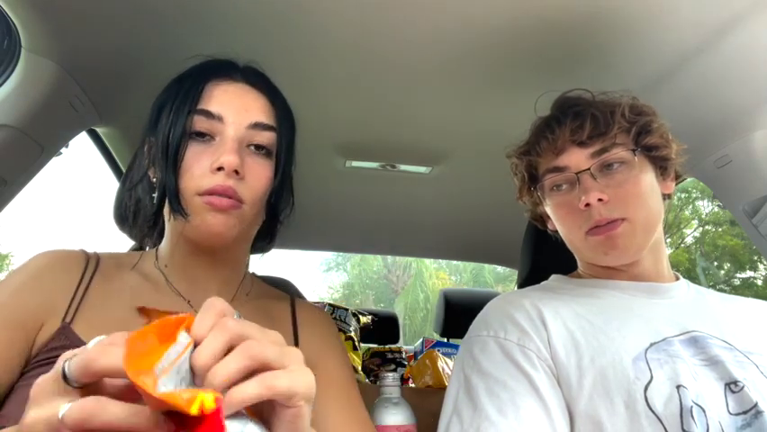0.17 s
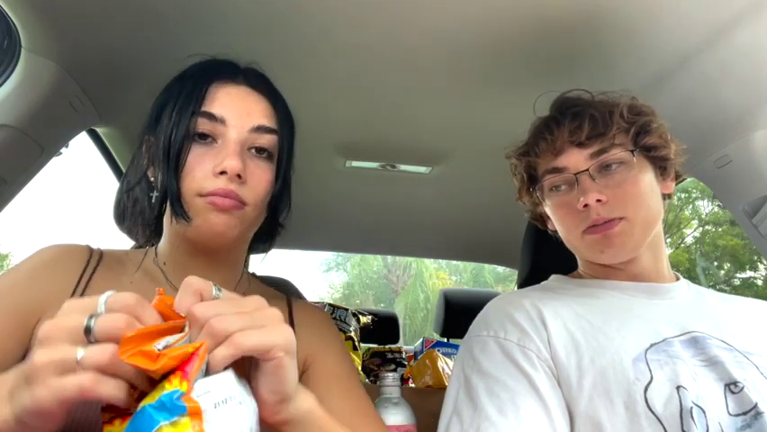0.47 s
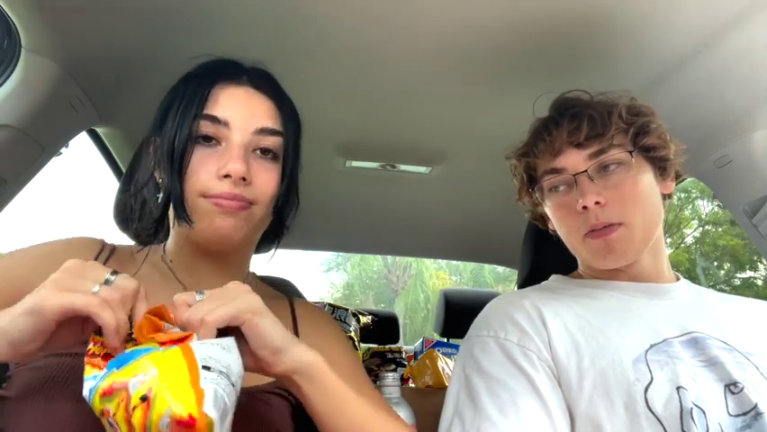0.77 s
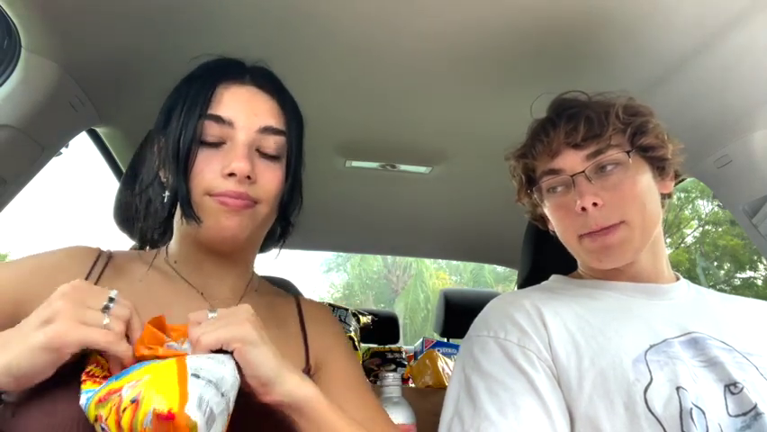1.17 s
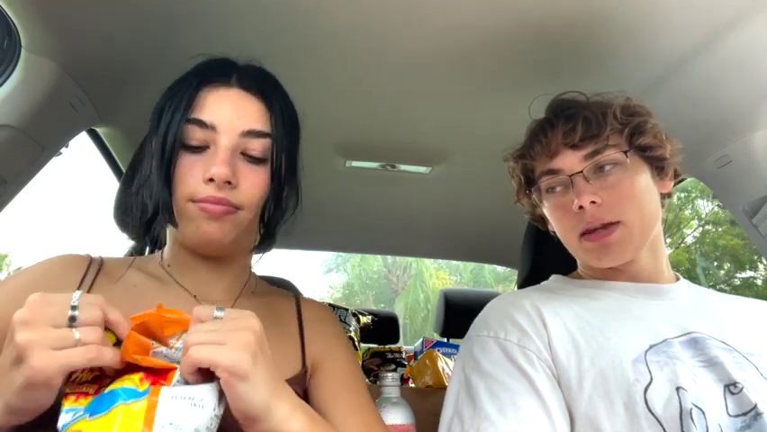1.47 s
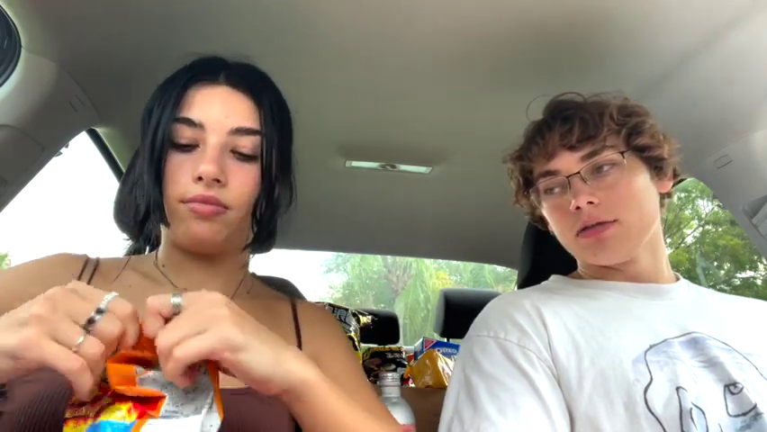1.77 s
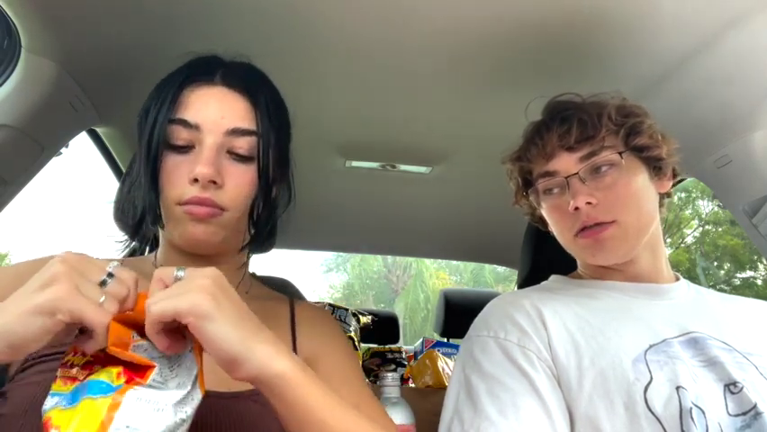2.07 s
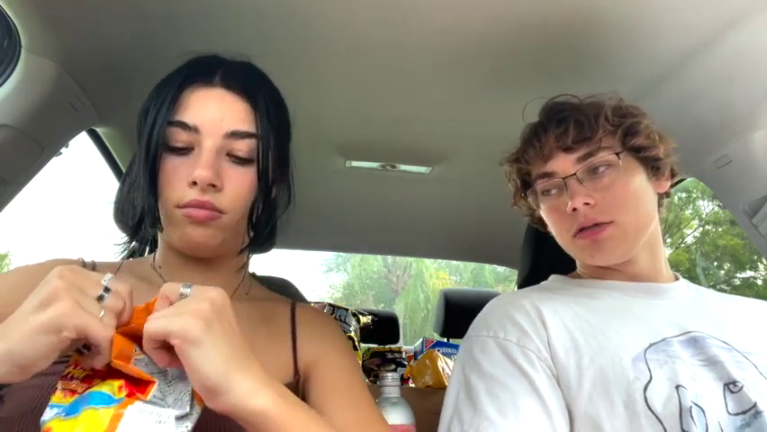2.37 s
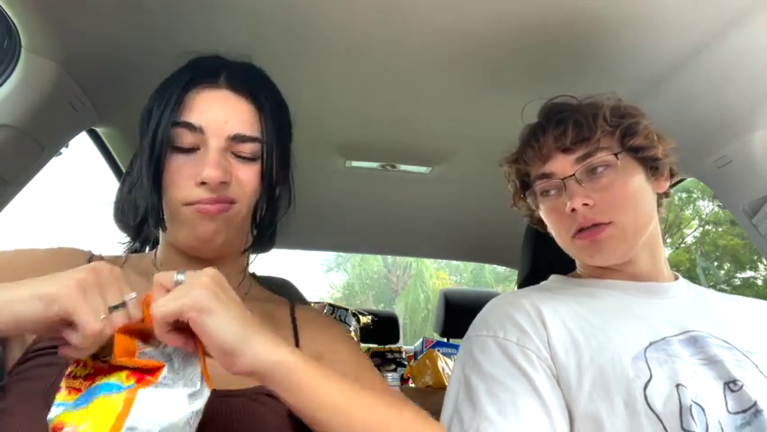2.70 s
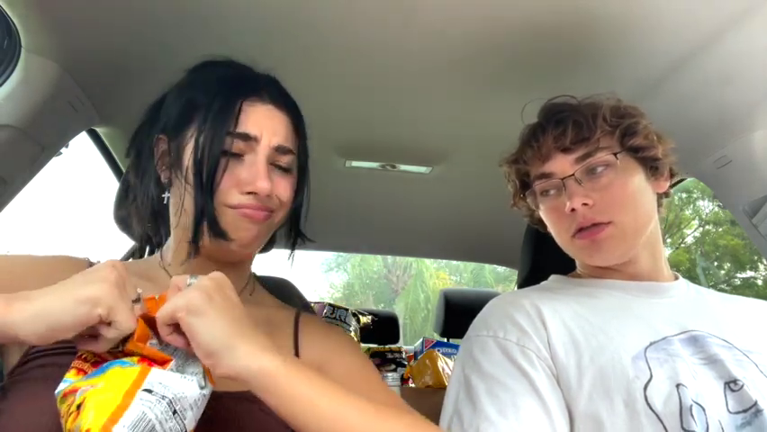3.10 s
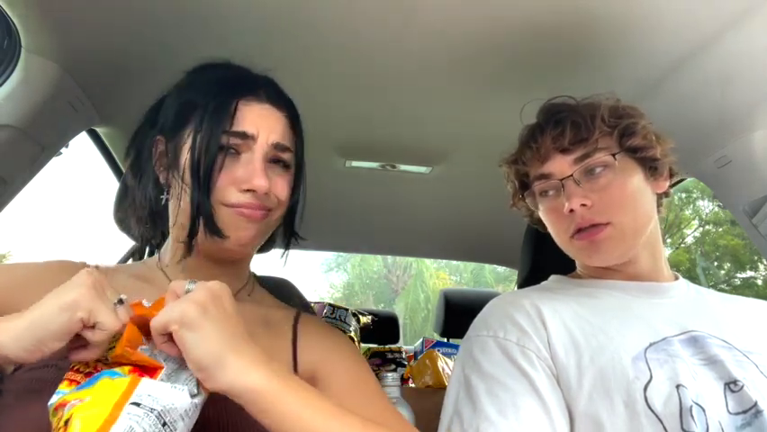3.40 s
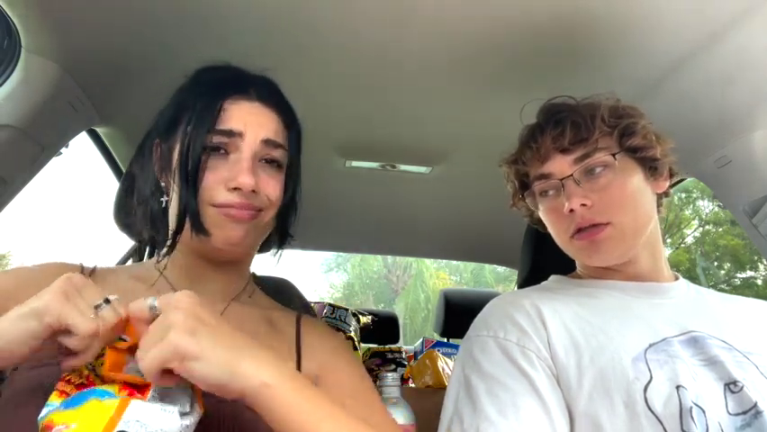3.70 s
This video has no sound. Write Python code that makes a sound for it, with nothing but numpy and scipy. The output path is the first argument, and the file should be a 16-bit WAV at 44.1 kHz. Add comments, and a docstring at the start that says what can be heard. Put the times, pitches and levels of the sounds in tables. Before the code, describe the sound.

A plastic snack bag crackles sharply as hands tug at it inside an idling car.

```python
"""Snack bag in a parked car

A foil-lined plastic bag is gripped, squeezed and pulled at close to a phone. Creases in the film
snap over, loud single ones above a dense fine crackle, and the air in the bag pops with them.
Fingers slide over the film and a palm thumps the full bag. The engine idles; the vents blow softly."""
import sys
import numpy as np
from scipy import signal
from scipy.fft import rfft, irfft, next_fast_len
from scipy.io import wavfile
from scipy.ndimage import uniform_filter1d, map_coordinates

SR = 44100
rng = np.random.default_rng(int(sys.argv[2]) if len(sys.argv) > 2 else 0)


def persist_wave(psi):
    """Save psi, clipped to +-1, as 16-bit WAV."""
    counts = np.round(np.clip(psi, -1, 1) * 32767).astype(np.int16)
    wavfile.write(sys.argv[1], SR, np.atleast_2d(counts).T)


N = 169785

POP_RISE_S, POP_T60_S, POP_SAG_PER_S = 0.002, 0.022, 25
# Crisp crackle colour, with a dip near 11 kHz and a steep cut above 16 kHz.
# Each row: frequency in Hz, level in dB.
CRISP_COLOUR = [(590, -11.5), (1160, -5.5), (1370, -1), (2870, -5), (5230, -10.5), (8360, -12.5),
                (11200, -24.5), (15200, -21), (15900, -38), (16500, -97)]
# The hollow colour of air and chips in the bag. Each row: frequency in Hz, level in dB.
BAG_COLOUR = [(60, -29), (160, -5.5), (386, -2.5), (664, 1), (931, -4.5), (1170, -2.5), (1600, -7),
              (2080, -21), (3520, -120)]
# The loud creases. Each row: start in seconds, level in dB, pop and treble trims in dB, pop pitch in Hz.
CREASE_SNAPS = [(0.041, -15, -18, -6, 574), (0.077, -4.5, -21, -16.5, 1190), (0.169, -17.5, -7, -3.5, 1150),
                (0.224, -6.5, -11.5, -12, 1060), (0.274, -0.5, -21, -16, 630), (0.312, -24, -25, 4, 598),
                (0.328, -8, -18.5, -40, 420), (0.383, -17, -15, -2, 674), (0.423, -8.5, -15.5, -14, 1190),
                (0.489, -4, -15.5, -16.5, 1210), (0.514, -12.5, -10.5, -8.5, 360),
                (0.549, -16.5, -7.5, -12.5, 1210), (0.573, -12.5, -13, -10, 584),
                (0.605, -7.5, -26, -16.5, 668), (0.649, -6.5, -27, -17.5, 583),
                (0.687, -12, -13.5, -42, 1250), (0.733, -17.5, -34, -3, 670),
                (0.82, -12.5, -15, -12.5, 746), (0.827, -11.5, -21, -9.5, 890),
                (0.883, -17.5, -17.5, -8, 533), (1.018, -6, -22.5, -10.5, 755), (1.058, -15, -15, -15, 614),
                (1.261, -28, -10, -8, 730), (1.324, -15, -15.5, -12.5, 710),
                (1.518, -20.5, -13, -16.5, 737), (1.567, -18.5, -17.5, -5, 890),
                (1.654, -22, -6.5, -14.5, 664), (1.666, -26, -3.5, -12, 650), (1.717, -19.5, -10, -7, 1170),
                (1.762, -14.5, -15.5, -5, 602), (1.839, -22, -15, -5, 1140), (1.877, -12.5, -27, -15, 420),
                (1.983, -20, -5.5, -5, 715), (2.04, -24.5, -20, -8, 720), (2.072, -24, -12, -9.5, 1420),
                (2.104, -19, -17.5, -20, 775), (2.168, -39.5, -0.5, -12, 640),
                (2.229, -20, -15.5, -8.5, 853), (2.329, -25.5, -11.5, -12.5, 723),
                (2.408, -20.5, -34, -2, 1210), (2.497, -14, -21.5, -13.5, 695),
                (2.58, -10, -11.5, -15, 650), (2.61, -24.5, -3, -17, 690), (2.625, -17, -27, -22, 1240),
                (2.649, -20.5, -12.5, -13, 840), (2.701, -20, -10, -18, 1100),
                (2.708, -13, -10.5, -17.5, 693), (2.74, -19, -16, -6.5, 730),
                (2.773, -15.5, -12.5, -16, 1230), (2.809, -10, -16.5, -18.5, 1390),
                (2.885, -12, -9.5, -15.5, 702), (2.923, -12.5, -13, -19, 1205),
                (2.937, -13.5, -10, -17, 1460), (3.095, -10, -18.5, -13, 778),
                (3.244, -25.5, -11.5, -11.5, 680), (3.263, -16.5, -14, -32, 472),
                (3.304, -20.5, -36, -11, 1320), (3.35, -20, -15.5, -8.5, 675),
                (3.398, -12.5, -17, -10.5, 1530), (3.43, -17.5, -14.5, -11.5, 855),
                (3.51, -18.5, -18.5, -15.5, 1300), (3.688, -15.5, -16.5, -12, 816),
                (3.763, -16, -21, -15, 970), (3.797, -12, -26, -12.5, 653)]


def snaps():
    """A crease creaks ever louder, lets go with a crack, pops the bag's air and dies in the cabin."""
    start, db, pop_db, treble_db, hz = np.transpose(CREASE_SNAPS)
    rise_s, crack_t60_s, cabin_t60_s, tick_t60_s = 0.0015, 0.03, 0.14, 0.0046
    thud_cut_hz, crack_cut_hz, crossover_hz = 260, 860, 3590
    t = np.arange(SR // 8) / SR
    shape = (1 - np.exp(-t / rise_s)) * (amp(-60 * t / crack_t60_s) + amp(-11 - 60 * t / cabin_t60_s))
    tick = amp(1 - 60 * t / tick_t60_s)
    lowpass = lambda f: 1 / (1 + (f / crossover_hz) ** 4)
    crack = bursts(start, db - 3.5, shape, CRISP_COLOUR)
    crack = filtered(crack, lambda f: lowpass(f) * f ** 2 / (f ** 2 + crack_cut_hz ** 2))
    treble = bursts(start, db + treble_db + 8, shape + tick, CRISP_COLOUR)
    treble = filtered(treble, lambda f: 1 - lowpass(f))
    thud = bursts(start, db + pop_db, shape, BAG_COLOUR)
    thud = filtered(thud, lambda f: f ** 4 / (f ** 4 + thud_cut_hz ** 4))
    lead_in = t[:SR // 50]
    swell = np.exp((lead_in - lead_in[-1]) / 0.0031)
    creak = bursts(start - lead_in[-1], db - 19.5, swell, CRISP_COLOUR)
    phase = sagging_phase(hz, t - 2 * POP_RISE_S)
    pop = place(start, ring(db + pop_db + 17, t) * np.array([np.sin(phase), 0.5 * np.cos(phase)]))
    return creak + crack + treble + thud + pop


# How hard the film is worked. Each row: time in seconds, crackle level in dB, body trim in dB.
HAND_PRESSURE = [(0, -30.5, -7), (0.03, -34, -4), (0.09, -27.5, -3), (0.2, -23, -7.5), (0.255, -33.5, 1),
                 (0.36, -27, -8), (0.53, -30.5, -9), (0.659, -32, -2.5), (0.79, -39.5, -15.5),
                 (0.861, -31.5, -7.5), (0.993, -47, 0.5), (1.04, -31, -12), (1.17, -41, -10),
                 (1.24, -38, 1.5), (1.475, -39, -17), (1.5, -58, -11), (1.54, -45.5, 1.2),
                 (1.689, -30.5, -9.5), (1.79, -42.5, -2.5), (1.95, -53, 2.5), (2.15, -49, -3),
                 (2.29, -54.5, -1), (2.46, -43.5, -11), (2.54, -46, 7), (2.68, -52.5, -5),
                 (2.76, -36, -8.5), (2.86, -63.5, 14), (2.911, -33.5, -9), (3.0, -41.5, -14),
                 (3.21, -53.5, 3), (3.46, -43, -7.5), (3.602, -50.5, -1.5), (3.66, -43, 1.5),
                 (3.85, -38, 0.5)]


def crackle():
    """Countless tiny creases give way in clumps, louder the harder the film is worked."""
    at, level_db, body_db = np.transpose(HAND_PRESSURE)
    grains_per_s, grain_t60_s = 1000, 0.014
    pip_hz, pip_octaves, pip_share = 720, 0.45, 0.6
    count = int(grains_per_s * N / SR)
    start = rng.random(count) * N / SR
    size = np.minimum(rng.exponential(size=count), 2.6)
    tilt_db = 2.5 * rng.uniform(-1, 1, count)
    clump_db = 2 * wobble(40)[(start * SR).astype(int)]
    db = 3.5 * size + clump_db
    t = np.arange(SR // 30) / SR
    shape = (1 - np.exp(-t / 0.0003)) * amp(-60 * t / grain_t60_s)
    film = unit(bursts(start, db + tilt_db, shape, CRISP_COLOUR))
    body = unit(bursts(start, db - tilt_db, shape, BAG_COLOUR))
    few = slice(0, count // 10)  # one crease in ten also pops the air, at its own pitch
    hz = pip_hz * 2 ** (pip_octaves * rng.standard_normal((count, 1))[few])
    phase = 2 * np.pi * hz * t
    pips = unit(place(start[few], ring(db[few], t) * np.array([np.sin(phase), 0.5 * np.cos(phase)])))
    body = np.sqrt(1 - pip_share) * body + np.sqrt(pip_share) * pips
    time = np.arange(N) / SR
    return amp(np.interp(time, at, level_db)) * (film + amp(2.5 + np.interp(time, at, body_db)) * body)


# Bright sliding hiss, with a notch near 11.5 kHz and a cut above 16 kHz.
# Each row: frequency in Hz, level in dB.
BRIGHT_COLOUR = [(2500, -5), (7000, 2.5), (9500, -1.5), (11500, -11.5), (14000, 1), (15900, -8.5),
                 (16500, -63)]
# Finger strokes. Each row: centre in seconds, length in seconds, level in dB, tilt towards bright in dB.
FINGER_STROKES = [(0.13, 0.06, -22.5, -4), (0.476, 0.091, -32.5, -3), (1.089, 0.039, -28.5, -3.5),
                  (1.434, 0.08, -38.5, 8.5), (2.402, 0.051, -40, 7.5), (3.046, 0.073, -38.5, 3),
                  (3.727, 0.13, -43, -9.5)]


def finger_slides():
    """Fingers rub over the film in soft, grainy swells of dull and bright hiss."""
    time, power = np.arange(N) / SR, np.zeros((2, N))
    for centre, length, db, tilt_db in FINGER_STROKES:
        swell = np.exp(-(2 * (time - centre) / length) ** 2)
        power += (amp(db + tilt_db * np.array([[-1], [1]])) * swell) ** 2
    dull_gain, bright_gain = np.sqrt(power)
    hiss = lambda colour: coloured(patchy_noise(bins=2, frames=10), colour)
    dull = hiss(CRISP_COLOUR) + amp(-6) * hiss(BAG_COLOUR)
    return (dull * dull_gain + hiss(BRIGHT_COLOUR) * bright_gain) * amp(1.74 * wobble(300))


# Palm hits. Each row: start in seconds, level in dB, starting pitch in Hz.
PALM_HITS = [(0.13, -7.5, 398), (0.155, -5.5, 286), (0.279, -8, 328), (2.886, -23, 374)]


def palm_thumps():
    """The palm hits the full bag: a low, hollow thump of a few cycles."""
    start, db, hz = np.transpose(PALM_HITS)
    t = np.arange(SR // 8) / SR
    thump = ring(db, t, t60_s=0.02) * np.sin(sagging_phase(hz, t))
    return place(start, np.array([thump, thump]))


# The engine's hum. Each row: pitch in Hz, relative level in dB.
ENGINE_TONES = [(26.9, -61.5), (53.8, -51.5), (80.7, -50.5), (107.5, -67), (325, -60)]
# Low vent rush, plus a separate faint hiss near 14.5 kHz above a dip.
# Each row: frequency in Hz, level in dB.
BED_COLOUR = [(15, -30), (25, -11), (100, -4.5), (373, -13.5), (451, -36), (1940, -47), (11800, -51),
              (14500, -31), (16000, -51)]


def engine_and_vents():
    """The engine idles a little unsteadily under the soft rush of the vents."""
    phase_per_hz = 2 * np.pi * np.cumsum(1 + 0.0078 * wobble(2.9)) / SR
    hum = sum(amp(db + 4.5 + 3 * wobble(8.02)) * np.sin(hz * phase_per_hz + rng.uniform(0, 2 * np.pi))
              for hz, db in ENGINE_TONES)
    rush = coloured(rng.standard_normal((2, N)), BED_COLOUR)
    return amp(-51 + 1.3 * wobble(7.65)) * rush + hum * [[1], [0]]  # hum in the mid only


def ring(db, t, t60_s=POP_T60_S):
    """Envelopes of the bag's air ringing: a quick rise and a short decay."""
    return amp(db[:, None] - 60 * t / t60_s) * (1 - np.exp(-t / POP_RISE_S))


def sagging_phase(hz, t):
    """Phases of tones whose pitch falls away from hz."""
    return 2 * np.pi * hz[:, None] * (1 - np.exp(-POP_SAG_PER_S * t)) / POP_SAG_PER_S


def bursts(start, db, shape, colour):
    """Mid and side noise bursts of one envelope and colour; overlaps add in power."""
    power = place(start, (amp(db)[:, None] * shape)[None] ** 2)
    return coloured(patchy_noise(), colour) * np.sqrt(power)


def patchy_noise(bins=5, frames=5, depth_db=2.5):
    """Two noises sharing patches of random gain, so no two creases have the same colour."""
    spectra = signal.stft(rng.standard_normal((2, N)), nperseg=256)[2]
    patches = uniform_filter1d(rng.standard_normal(spectra.shape[1:]), size=bins, axis=0)
    patches = uniform_filter1d(patches, size=frames, axis=1)
    return signal.istft(spectra * amp(depth_db * unit(patches)), nperseg=256)[1][:, :N]


def place(start, sounds):
    """Sums short sounds (channels x events x samples) at their starts in seconds."""
    at = (np.round(start * SR).astype(int)[:, None] + np.arange(sounds.shape[2])).ravel()
    return np.array([np.bincount(at, channel.ravel(), N + SR)[:N] for channel in sounds])


def coloured(noise, colour):
    """Noise through an EQ curve, at unit RMS."""
    return unit(filtered(noise, lambda hz: amp(along(colour, hz))))


def filtered(x, response):
    """Applies a complex frequency response."""
    size = next_fast_len(N + 8192)
    return irfft(rfft(x, size) * response(np.fft.rfftfreq(size, 1 / SR)), size)[..., :N]


def wobble(rate):
    """A smooth random curve, rate knots a second."""
    return map_coordinates(rng.standard_normal(int(N * rate / SR) + 4), [np.arange(N) * rate / SR])


def along(points, hz):
    """Reads (Hz, value) points on a log frequency axis."""
    freqs, values = np.transpose(points)
    return np.interp(np.log(hz + 1), np.log(freqs + 1), values)


def amp(db):
    return 10 ** (np.asarray(db) / 20)


def unit(x):
    return x / np.sqrt(np.mean(x ** 2) + 1e-20)


# Phase between the phone's two mic ports. Each row: frequency in Hz, left's lead in radians.
LEFT_LEAD = [(0, 0.5), (1210, 1.22), (2500, 5.5), (4480, 6.5), (6030, 7.5), (7320, 3.5), (8960, 8),
             (10400, 3.5), (12700, 2.5), (14000, 0.8)]
# Stereo balance. Each row: frequency in Hz, left over right in dB.
LEFT_BALANCE = [(40, 7.5), (150, 0.5), (700, 5), (1400, 0), (15000, 0.2)]
# Stereo focus. Each row: frequency in Hz, left-right likeness from 0 to 1.
LIKENESS = [(40, 0.92), (120, 0.95), (500, 0.51), (2500, 0.33), (6000, 0.25), (12000, 0.91)]


def scene():
    """Bag and car, mixed as mid and side, reach the phone's two mic ports."""
    mid, side = snaps() + crackle() + finger_slides() + palm_thumps() + engine_and_vents()
    sign = np.array([[1], [-1]])
    width = lambda hz: np.arccos(np.clip(along(LIKENESS, hz), 0, 1)) / 2
    lead = lambda hz: np.interp(hz, *np.transpose(LEFT_LEAD))
    ports = lambda hz: amp(sign * along(LEFT_BALANCE, hz) / 2) * np.exp(0.5j * sign * lead(hz))
    centre = filtered(mid, lambda hz: ports(hz) * np.cos(width(hz)))
    spread = filtered(side, lambda hz: sign * ports(hz) * np.sin(width(hz)))
    return centre + spread


def record(dry):
    """A brick-wall high cut takes off the very top."""
    return filtered(dry, lambda hz: hz < 16950)


dry = scene()
out = record(dry)
persist_wave(out)
```